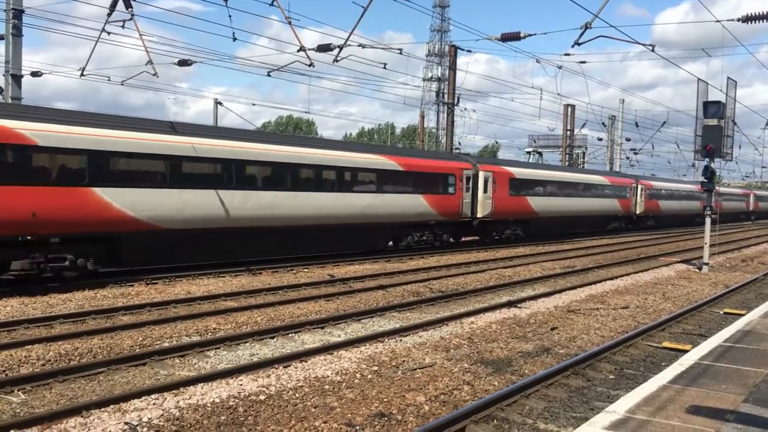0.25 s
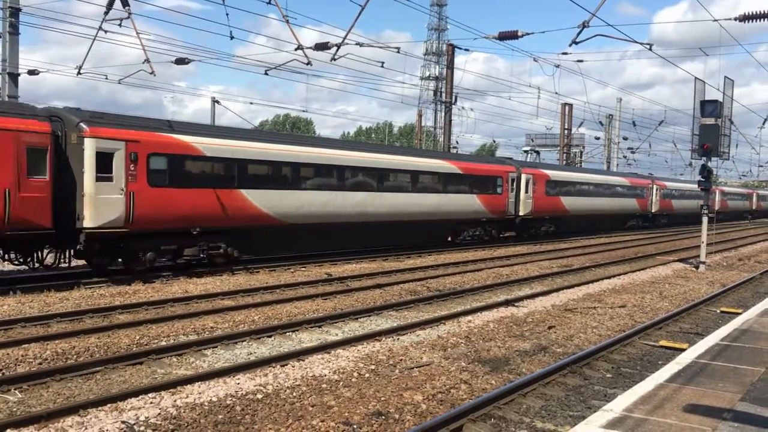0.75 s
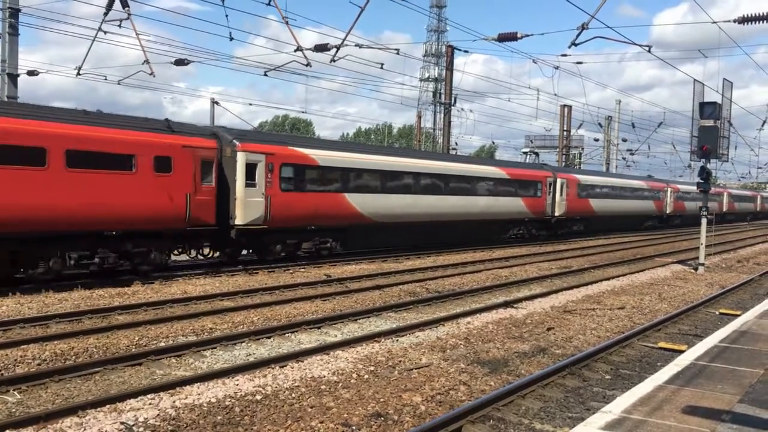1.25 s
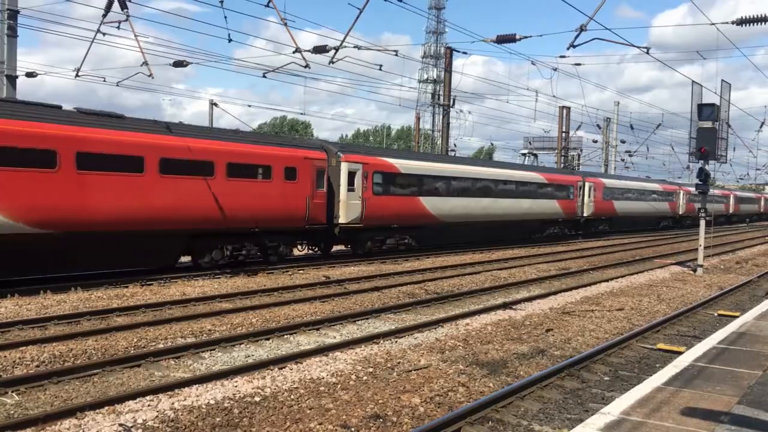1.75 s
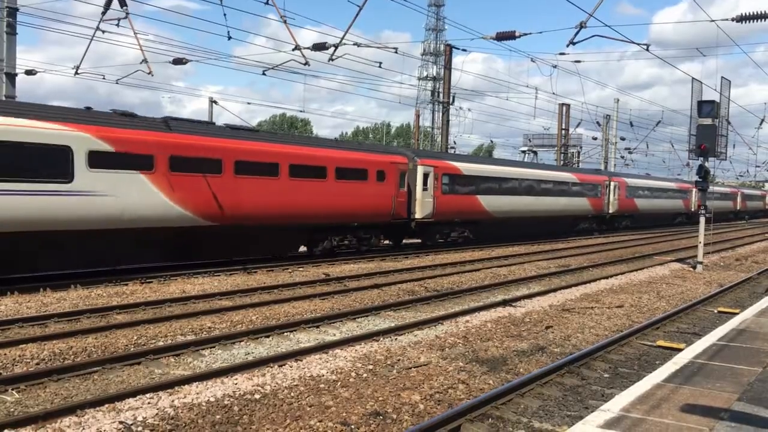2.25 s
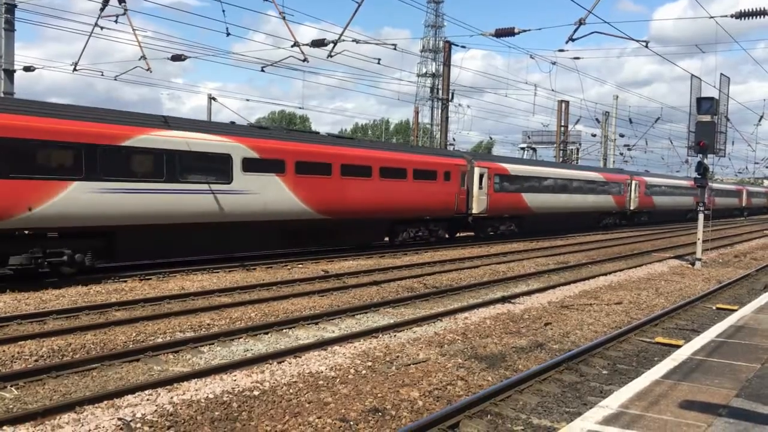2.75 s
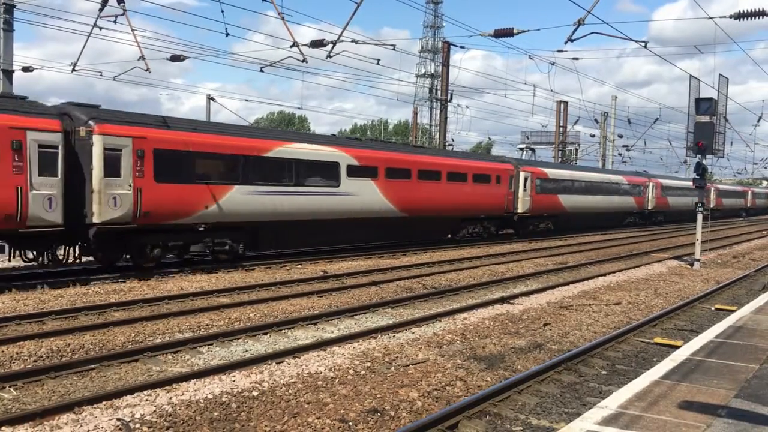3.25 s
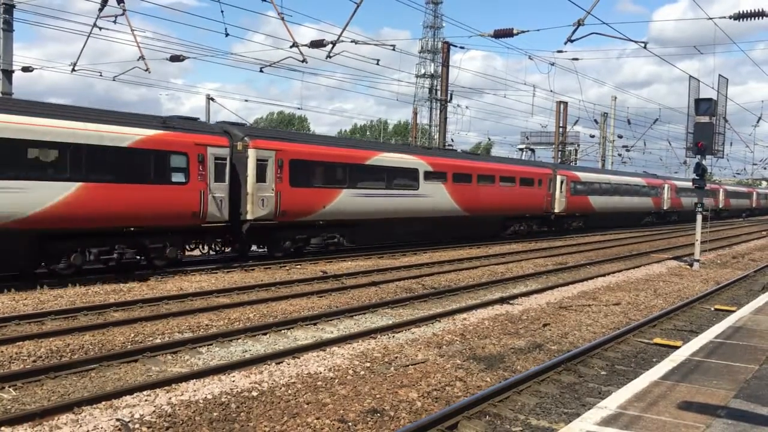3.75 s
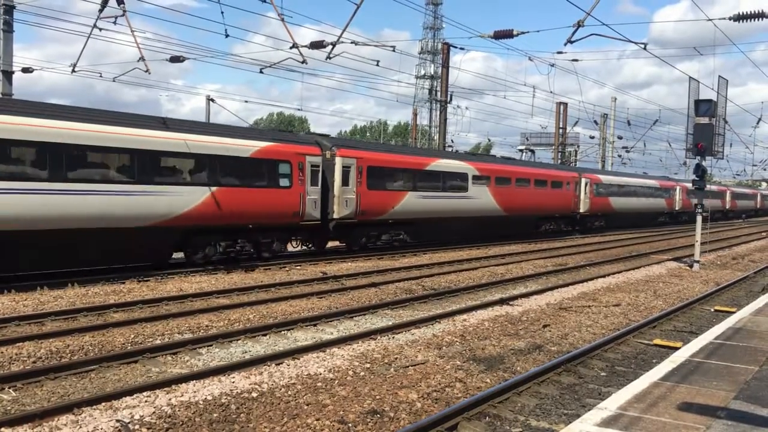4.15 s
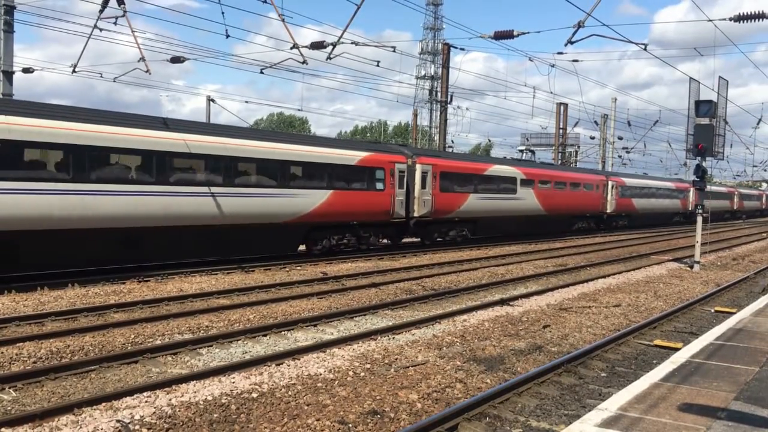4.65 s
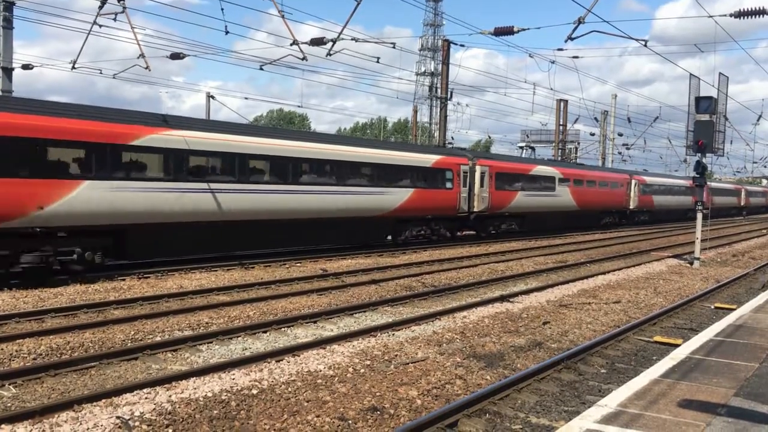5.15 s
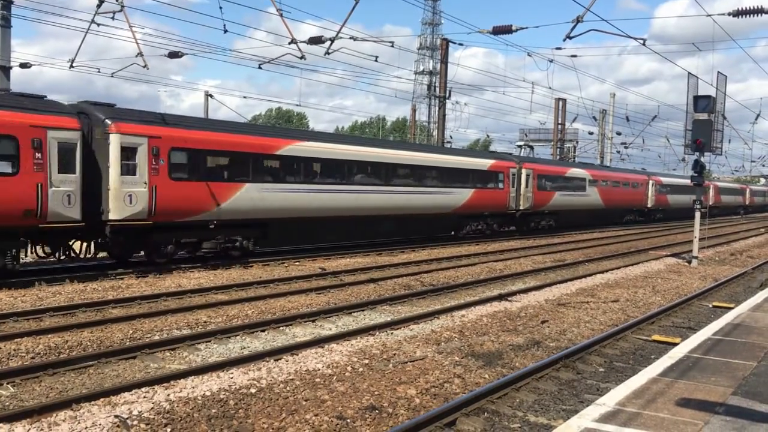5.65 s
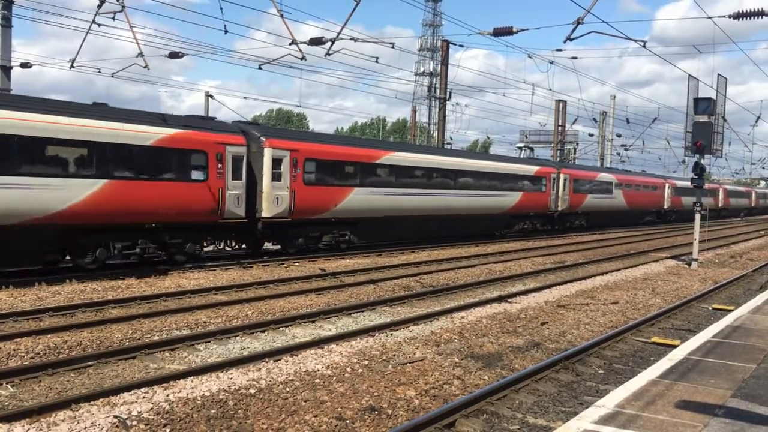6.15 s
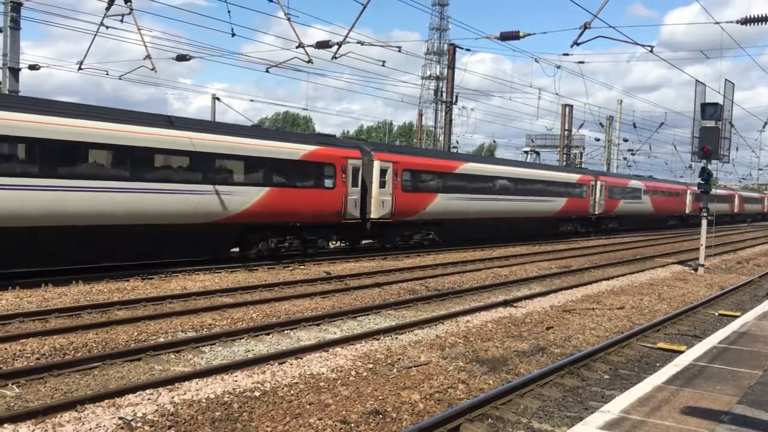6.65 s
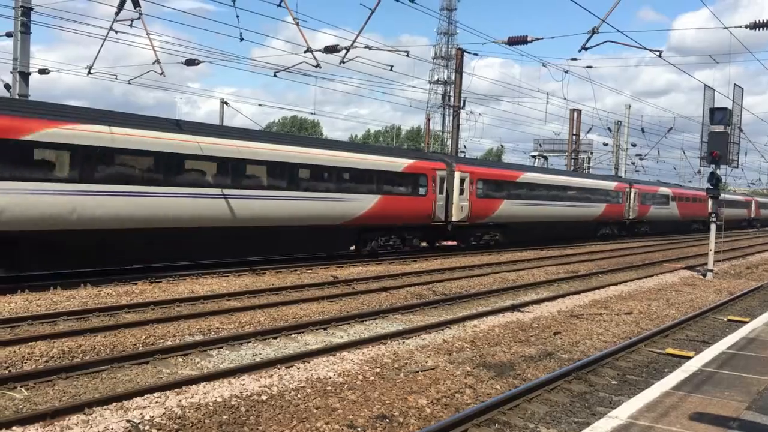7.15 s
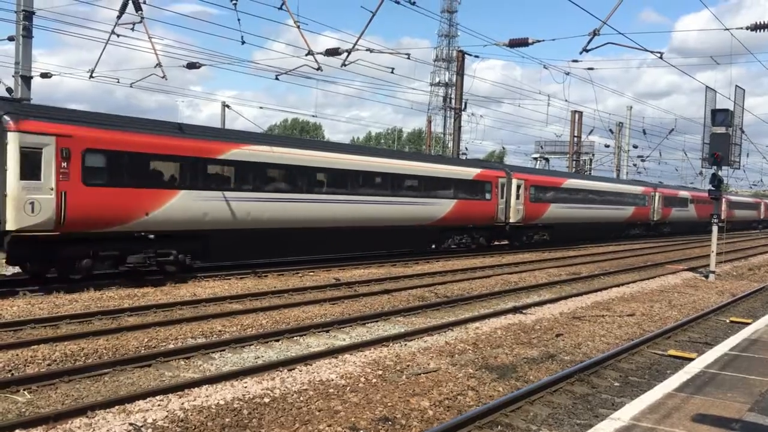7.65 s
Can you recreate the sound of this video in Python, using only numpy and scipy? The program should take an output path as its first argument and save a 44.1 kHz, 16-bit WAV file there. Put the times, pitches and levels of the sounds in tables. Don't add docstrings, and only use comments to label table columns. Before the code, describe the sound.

Gusty wind buffets a bare microphone in low lumps while train coaches roll past, wheels humming and clacking over a rail joint.

```python
import sys
import numpy as np
from scipy import signal
from scipy.fft import rfft, irfft
from scipy.io import wavfile
from scipy.ndimage import uniform_filter1d

SR = 44100
rng = np.random.default_rng(int(sys.argv[2]) if len(sys.argv) > 2 else 0)


def gain_from_db(level_db):
    decades = np.asarray(level_db, float) / 20
    return 10 ** decades


def log_audio(samples):
    frames = np.atleast_2d(samples).T
    limited = np.clip(frames, -1, 1)
    pcm = np.round(limited * 32767).astype(np.int16)
    wavfile.write(sys.argv[1], SR, pcm)


N = 348779
RUN_IN = SR // 4

EDGES_HZ = 22 * 2 ** np.arange(0, 9.7, 1 / 3)
CENTRES_HZ = np.sqrt(EDGES_HZ[1:] * EDGES_HZ[:-1])

# frequency in Hz, density in dB per Hz.
LARGE_EDDIES = [(13, -37), (22, -7.5), (38, 1), (59, 5), (92, -3), (119, -15.5), (162, -27.5), (220, -37),
                (290, -51), (480, -120)]
MIDDLE_EDDIES = [(70, -24), (110, 5.5), (150, 4), (220, -7.5), (300, -24.5)]
FINE_EDDIES = [(150, -19), (230, 1.5), (290, 0), (400, -8.5), (600, -17), (1000, -38), (1500, -49.5)]
# time in seconds, strength in dB, fineness of its eddies in dB.
BREEZE = [(0, -36, -19.5), (.3, -41, -12), (.75, -36, -19.5), (1.2, -40, -15.5), (1.42, -40, -13),
          (2.14, -39, -13.5), (2.55, -35, -16), (2.9, -40.5, -11.5), (3.25, -36, -17), (4.35, -42, -11),
          (5.2, -34, -13), (5.93, -34.5, -14), (6.35, -38, -9.5), (6.85, -34, -13), (7.05, -36.5, 3),
          (7.27, -39.5, -10.5), (7.68, -36.5, -1), (7.91, -36.5, -7.5)]
# crest in seconds, heave in dB, length in seconds, middle eddies in dB re heave.
GUSTS = [(0.075, -27, 0.029, -14.5), (0.192, -31, 0.055, -12.5), (.44, -36.5, 0.17, -8),
         (0.609, -30, 0.072, -15), (0.84, -39.5, 0.12, -3.5), (0.965, -30.5, 0.025, -16),
         (1.483, -33, 0.12, -10.5), (1.424, -40, .06, -5.5), (1.653, -33, 0.09, -10.5),
         (1.838, -30.5, 0.024, -26), (2.339, -29.5, 0.053, -7.5), (2.755, -37.5, 0.083, -4.5),
         (3.025, -24.5, 0.033, -22), (3.6, -28, 0.023, -15), (3.815, -30, 0.1, -23),
         (5.016, -28, 0.096, -10), (5.09, -23, 0.057, -6), (5.321, -23.5, 0.034, -14),
         (5.446, -33, 0.058, -15), (5.544, -27.5, 0.042, -13.5), (5.783, -34.5, 0.19, -11.5),
         (6.052, -33.5, 0.15, -32), (6.6, -34, 0.072, -18), (6.946, -33, .07, 2),
         (7.146, -33.5, 0.08, -2.5), (7.374, -24.5, .07, -11.5), (7.503, -25.5, 0.063, -16),
         (7.625, -40.5, 0.07, 9.5), (7.784, -32.5, .07, 3.5), (7.9, -34.5, 0.057, 5.5)]
# centre in seconds, depth in dB.
LULLS = [(.13, 8), (0.784, 9), (1.12, 7), (2.295, 14), (2.96, 9.5), (4.27, 7), (4.39, 5), (5.05, 10),
         (5.153, 7.5), (5.61, 6), (7.23, 3), (7.44, 3), (7.574, 5), (7.82, 9)]

# time in seconds, rail hum in dB.
NEARNESS = [(0, -64.5), (.86, -66.5), (1.15, -65), (2.31, -64), (2.95, -65.5), (3.99, -62.5), (5.46, -62),
            (5.9, -60.5), (6.34, -58), (6.76, -57), (7.18, -55), (7.4, -56.5), (7.91, -57)]
# frequency in Hz, density in dB per Hz.
HUM = [(180, -32.5), (300, -2.5), (507, -15.5), (593, -6.5), (832, -15.5), (931, -22), (1010, -16),
       (1550, -23), (1800, -29.5), (2340, -49.5), (3960, -120)]
HISS = [(820, -18), (1400, 4.5), (1760, -11.5), (2150, 5.5), (2690, -10.5), (3080, -8.5), (4850, -34),
        (5500, -15), (7150, -33), (12100, -120)]
# frequency in Hz, width in Hz, level in dB.
RAIL = [(606, 120, -14.5), (936, 65, -7), (1160, 150, -21.5)]
WHEEL_DISC = [(2240, 140, 2), (3700, 250, -14)]

# start in seconds, peak in dB, puff in dB re peak, heave in dB re peak, pitch in Hz.
POPS = [(0.196, -40, -24, -11, 202), (0.442, -43, -27, 23, 285), (0.594, -39.5, -23, 12.5, 215),
        (0.804, -31.5, -20, 6, 288), (0.85, -44, -28, 12, 223), (0.883, -37.5, -32, 5, 207),
        (1.036, -35, -21, -4, 213), (1.549, -43, -13, 13.5, 223), (1.655, -35.5, -18, -12, 248),
        (2.322, -45.5, -22, 12, 202), (2.346, -41, -22, 8, 277), (3.007, -39, -25, -6, 253),
        (3.173, -35, -27, -10, 202), (3.727, -50, -7, 16, 310), (5.02, -45, -21, 19.5, 202),
        (5.072, -30, -12.5, 13.5, 202), (5.091, -38.5, -21, 14.5, 202), (5.119, -39.5, -8, 11, 202),
        (5.695, -36.5, -25, -2, 347), (6.695, -35, -14, -14, 223), (6.918, -45.5, -14, 21.5, 202),
        (7.285, -36, -28, -7, 237), (7.366, -33.5, -10, 14, 202), (7.521, -32, -20.5, 11.5, 202)]
# start in seconds, peak in dB, puff in dB re peak, pitch in Hz.
FLURRIES = [(6.952, -28, -10, 304), (7.002, -32.5, -15, 226), (7.024, -36, -22, 202),
            (7.042, -23.5, -29, 247), (7.078, -27, -18, 299), (7.126, -33.5, -12, 250),
            (7.606, -26.5, -21, 185), (7.641, -37, -23, 250), (7.684, -25.5, -32, 231),
            (7.71, -28.5, -26, 290), (7.754, -27.5, -26.5, 223), (7.789, -37, -22, 190),
            (7.842, -25.5, -26, 221)]

# start in seconds, hold in seconds, level in dB.
LEAKS = [
    (0.664, 0.4, -81),
    (3.3, 0.31, -86.5),
]
# frequency in Hz, density in dB per Hz.
JET = [(1800, -28.5), (2600, 4.5), (3700, -1), (4500, -11), (6500, -6), (7800, -14.5)]

# time in seconds, peak in dB, then rail ring, sleeper thud and ping, each in dB re peak.
AXLES = [(1.385, -49.5, 10, 11.5, 1), (1.6683, -51.5, 11, 13, -1), (2.141, -52, 13.5, 10.5, -2),
         (2.4197, -49.5, 9, 8, -5), (2.796, -66, 18, 13, 3), (3.8267, -47.5, 7, 15, 1.5),
         (4.098, -51.5, 10, 15.5, -7), (4.5462, -48.5, 9, 10, -12), (4.812, -48, 9, 6.5, -16.5),
         (6.1673, -48, 11.5, 9, 2.5), (6.425, -47.5, 11.5, 7.5, -3), (6.8838, -45.5, 8, 0, -7),
         (7.1367, -51.5, 17, 9, 2.5), (7.894, -49, 11.5, 10, 1)]
# frequency in Hz, density in dB per Hz, 60 dB decay in seconds, rise in seconds.
CRASH = [(250, 0, 0.26, 0.0046), (570, -13, 0.17, 0.01), (1100, -18, .22, 0.006),
         (2300, -22.5, 0.23, 0.00059), (4020, -32, 0.14, 0.0017), (6500, -12.5, 0.15, 0.0029),
         (9050, -33, .12, 0.0025)]
# frequency in Hz, level in dB, 60 dB decay in seconds.
WHEEL = [(1529, 0, 0.07), (1900, -9, .06), (2105, 1, 0.07), (2660, -12, 0.06), (2950, -8, 0.035),
         (3450, -12, 0.035), (3770, -8, 0.045), (4380, -21, .05)]
RAIL_HEAD = [(933, -1, 0.11), (1096, -10.5, 0.017)]
SLEEPER = [(338.7, 3, 0.11), (500, -19.5, 0.047), (675, -17, 0.074)]

# frequency in Hz, density in dB per Hz.
SELF_NOISE = [(1500, -23), (3000, 4), (4500, 0), (4900, -2.5), (5600, 0), (7700, -4), (9200, -2.5),
              (10400, -7.5), (11200, -5), (13000, -6.5), (16000, -11)]


def rms_one(x):
    return x / np.sqrt(np.mean(x ** 2) + 1e-20)


def in_time(rows):
    s, *columns = np.transpose(rows)
    return [np.interp(np.arange(N) / SR, s, c) for c in columns]


def at_hz(points, hz, axis=1):
    points = np.array(points)
    return np.interp(np.log(hz), np.log(points[:, 0]), points[:, axis])


def drift(rate):
    r = np.exp(-80 * np.pi * rate / SR)
    white = rng.standard_normal(N // 40 + 2002)
    slow = signal.lfilter([1], [1, -2 * r, r * r], white)[2000:]
    return np.interp(np.arange(N) / 40, np.arange(len(slow)), rms_one(slow))


def resonate(x, hz, width_hz):
    r = np.exp(-np.pi * width_hz / SR)
    zeros = np.array([1, 0, -1]) * (1 - r * r) / 2
    return signal.lfilter(zeros, [1, -2 * r * np.cos(2 * np.pi * hz / SR), r * r], x)


def steep_filter(x, hz, kind="low"):
    lead = min(RUN_IN, len(x) - 1)
    sos = signal.butter(4, hz, kind, fs=SR, output="sos")
    return signal.sosfilt(sos, np.r_[x[lead:0:-1], x])[lead:]


def bands(spectrum):
    white = rng.standard_normal((2, N + RUN_IN))
    for k, hz in enumerate(CENTRES_HZ):
        if spectrum[0][0] <= hz <= spectrum[-1][0] and at_hz(spectrum, hz) > -50:
            sos = signal.butter(2, EDGES_HZ[k:k + 2], "band", fs=SR, output="sos")
            yield hz, gain_from_db(at_hz(spectrum, hz)) * signal.sosfilt(sos, white[k % 2])[RUN_IN:]


def patchy(spectrum, shared_db, own_db, rate):
    together = shared_db * drift(rate)
    return rms_one(sum(gain_from_db(together + own_db * drift(rate / 2)) * band for hz, band in bands(spectrum)))


def coloured(spectrum):
    hz = np.maximum(np.fft.rfftfreq(N, 1 / SR), 1)
    return rms_one(irfft(rfft(rng.standard_normal(N)) * gain_from_db(at_hz(spectrum, hz)), N))


def evened(x, window_s, share):
    window = int(window_s * SR)
    power = uniform_filter1d(uniform_filter1d(x ** 2, window), window)
    return rms_one(x / (power + 0.02) ** (share / 2))


def gusts():
    rise_share, lull_s = 0.63, 0.03
    t, heave, eddies = np.arange(0, N + 64, 64) / SR, 0, 0
    for s, db, length, eddy_db in GUSTS:
        bell = np.exp(-(2 * (t - s) / (length * np.where(t < s, rise_share, 1))) ** 2)
        heave = heave + gain_from_db(2 * db) * bell
        eddies = eddies + gain_from_db(2 * (db + eddy_db)) * bell
    lull_db = sum(depth_db * np.exp(-(2 * (t - s) / lull_s) ** 2) for s, depth_db in LULLS)
    return in_time(np.c_[t, heave, eddies, lull_db])


def wind():
    breeze_db, fine_db = in_time(BREEZE)
    gust_heave, gust_eddies, lull_db = gusts()
    heave = steep_filter(patchy(LARGE_EDDIES, shared_db=1.5, own_db=-0.5, rate=25), 250)
    lumps = steep_filter(patchy(MIDDLE_EDDIES, shared_db=4.5, own_db=2.36, rate=29), 400)
    rattle = steep_filter(patchy(FINE_EDDIES, shared_db=3.0, own_db=0.96, rate=25), 1100)
    eddy_db = breeze_db - 1 + 0.66 * fine_db
    rattle_db = breeze_db - 4.5 + fine_db
    gust_rattle = gain_from_db(2 * -16) * gust_eddies
    out = np.sqrt(gain_from_db(2 * breeze_db) + gust_heave) * evened(heave, 0.079, share=0.96)
    out += np.sqrt(gain_from_db(2 * eddy_db) + gust_eddies) * evened(lumps, 0.047, share=0.78)
    out += np.sqrt(gain_from_db(2 * rattle_db) + gust_rattle) * evened(rattle, 0.03, share=0.39)
    return gain_from_db(-lull_db) * out


def rolling():
    hum_db, = in_time(NEARNESS)
    nearer_db = hum_db + 65
    hiss_db = -79 + 0.52 * nearer_db
    ring_db = -84.5 + 0.6 * nearer_db
    roughness = rng.standard_normal(N)

    def ringing(modes):
        return sum(gain_from_db(db + 15.0 + 2.7 * drift(2.7)) * resonate(roughness, hz, width)
                   for hz, width, db in modes)

    hum = steep_filter(patchy(HUM, shared_db=-1.0, own_db=1.6, rate=15) + ringing(RAIL), 2500)
    hiss = patchy(HISS, shared_db=0.9, own_db=1.3, rate=8.5)
    return gain_from_db(hum_db) * hum + gain_from_db(hiss_db) * hiss + gain_from_db(ring_db) * ringing(WHEEL_DISC)


def pops():
    flurry_heave_db = -4.5
    out, t = np.zeros(N + SR), np.arange(SR // 10) / SR
    onset = 1 - np.exp(-t / 0.0019)
    bursts = [*POPS, *((s, db, puff_db, flurry_heave_db, hz) for s, db, puff_db, hz in FLURRIES)]
    for (s, db, puff_db, heave_db, hz), sign in zip(bursts, rng.choice([-1, 1], len(bursts))):
        swing = np.sin(2 * np.pi * hz * t) * onset * np.exp(-t * hz * 0.88)
        heave = np.sin(2 * np.pi * 110 * t) * onset * np.exp(-t / 0.011)
        air = rms_one(steep_filter(resonate(rng.standard_normal(len(t)), 600, 450), 1100))
        puff = air * t / 0.0042 * np.exp(1 - t / 0.0029)
        push = sign * (gain_from_db(8.5) * swing + gain_from_db(heave_db + 1.0) * heave)
        out[round(s * SR):][:len(t)] += gain_from_db(db) * (push + gain_from_db(puff_db - 2.0) * puff)
    return steep_filter(out[:N], 1500)


def air_valve():
    rise_db_per_s, fall_db_per_s = 60, 89
    t, leak = np.arange(N) / SR, 0
    for s, hold, db in LEAKS:
        away_db = np.maximum(rise_db_per_s * (s - t), fall_db_per_s * (t - s - hold))
        leak = leak + gain_from_db(db - np.maximum(0, away_db))
    return leak * coloured(JET)


def struck(modes, at, blow_db, contact_s, top_hz):
    out, fade = np.zeros(N), np.exp(-1 / (contact_s * SR))
    for hz, db, t60 in modes:
        blows = np.zeros(N + SR)
        blows[at] = gain_from_db(blow_db + db + rng.normal(0, 0.86, len(at)))
        grind = rng.choice([-1, 1], N) * signal.lfilter([1], [1, -fade], blows[:N] + 1e-18)
        out += resonate(grind, hz, np.log(1000) / (np.pi * t60))
    return steep_filter(out, top_hz)


def crash(at, peak_db, ring_db, thud_db):
    out = np.zeros(N)
    for hz, band in bands(CRASH):
        if hz < 600:
            part_db = thud_db
        elif hz < 1200:
            part_db = ring_db
        elif hz > 4000:
            part_db = -23.5 - 0.1 * ring_db
        else:
            part_db = 0
        blows = np.zeros(N)
        blows[at] = gain_from_db(peak_db + part_db + 18.5 + rng.normal(0, 0.75, len(at)))
        fall = gain_from_db(-60 / (at_hz(CRASH, hz, axis=2) * SR))
        rise = np.exp(-1 / (max(at_hz(CRASH, hz, axis=3), 1e-4) * SR))
        dying = signal.lfilter([1], [1, -fall], blows + 1e-18)
        out += band * signal.lfilter([1 - rise], [1, -rise], dying)
    return out


def clacks():
    onset_lead_s, sleeper_lag_s = 0.0033, 0.015
    s, peak_db, ring_db, thud_db, ping_db = np.transpose(AXLES)
    at = np.round((s - onset_lead_s) * SR).astype(int)
    ping_at = at + round(onset_lead_s * SR / 2)
    thud_at = at + round(sleeper_lag_s * SR)
    wheel = struck(WHEEL, at, peak_db + 15.5, contact_s=0.0039, top_hz=4930)
    ping = struck(RAIL_HEAD, ping_at, peak_db + ping_db + 47.0, contact_s=1 / SR, top_hz=2020)
    thud = struck(SLEEPER, thud_at, peak_db + thud_db + 25.5, contact_s=0.0067, top_hz=980)
    return crash(at, peak_db, ring_db, thud_db) + wheel + ping + thud


def scene():
    return (wind() + rolling() + pops() + air_valve() + clacks())[None, :]


def top_cut(x):
    return signal.sosfilt(signal.butter(12, 15640, fs=SR, output="sos"), x)


def record(dry):
    cut_in_db, cut_in_s, cut_out_s = -40, 0.0046, 0.001
    n = np.arange(N)
    x = steep_filter(dry[0] + gain_from_db(-81.5) * coloured(SELF_NOISE), 29, "high")
    x = x + (gain_from_db(cut_in_db) - x[0]) * np.exp(-n / (cut_in_s * SR))
    x = x * (1 - np.exp(-n[::-1] / (cut_out_s * SR)))
    return top_cut(x[None, :])


dry = scene()
out = record(dry)
log_audio(out)
```